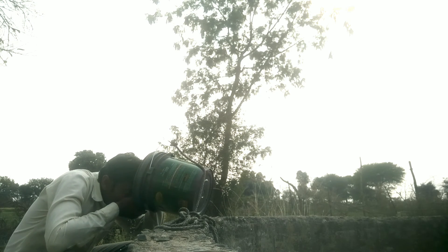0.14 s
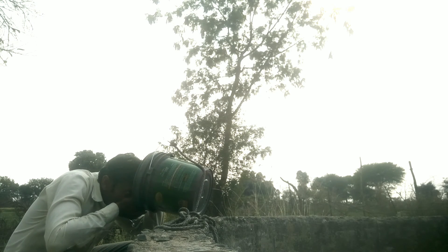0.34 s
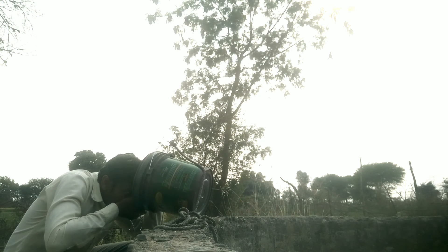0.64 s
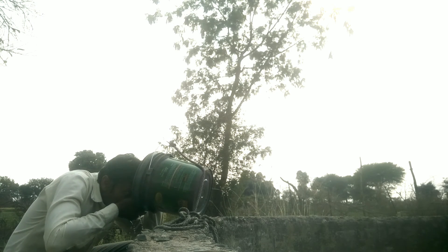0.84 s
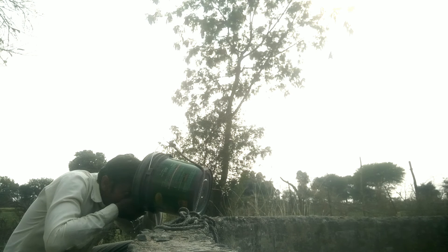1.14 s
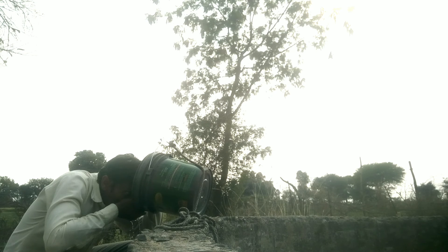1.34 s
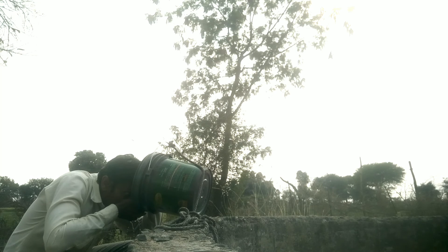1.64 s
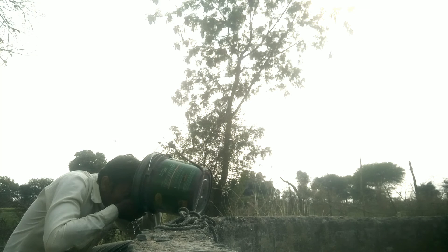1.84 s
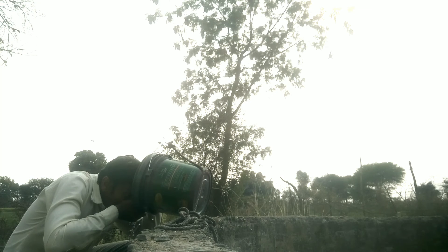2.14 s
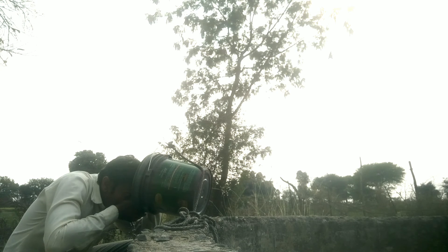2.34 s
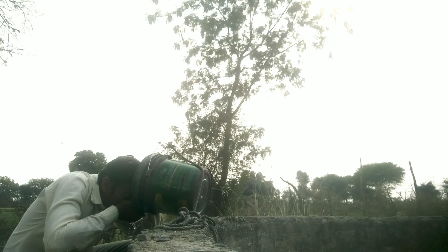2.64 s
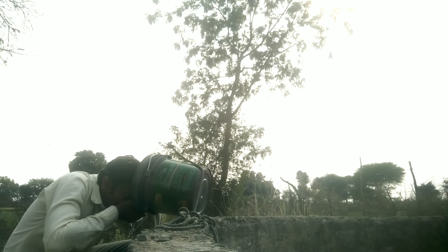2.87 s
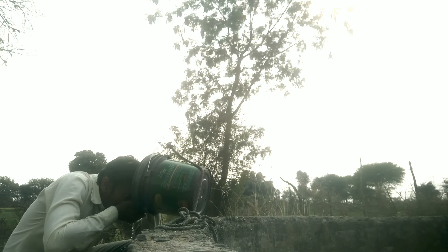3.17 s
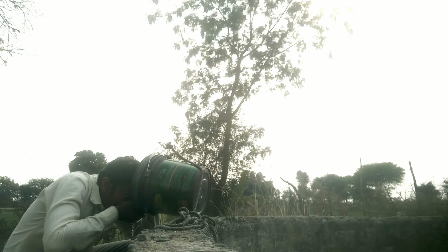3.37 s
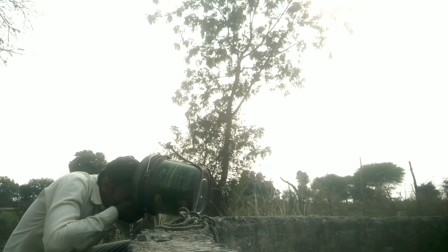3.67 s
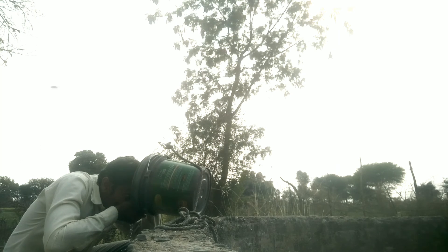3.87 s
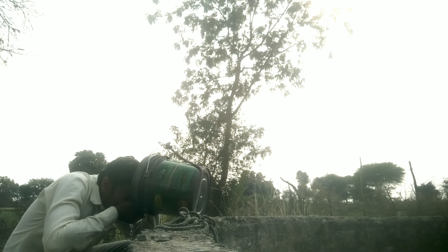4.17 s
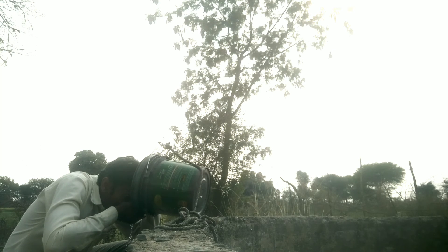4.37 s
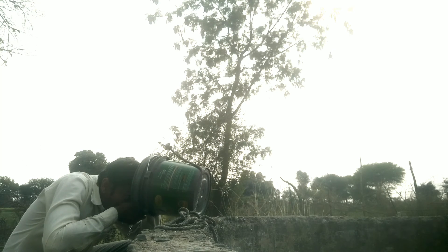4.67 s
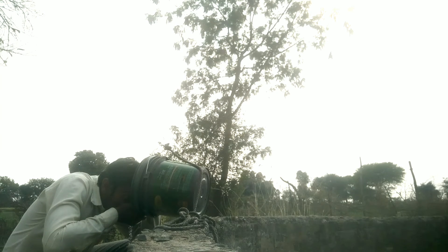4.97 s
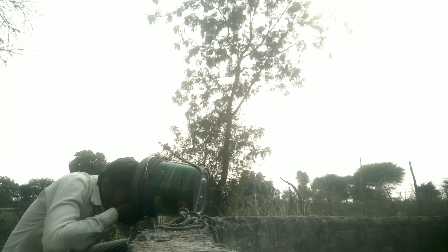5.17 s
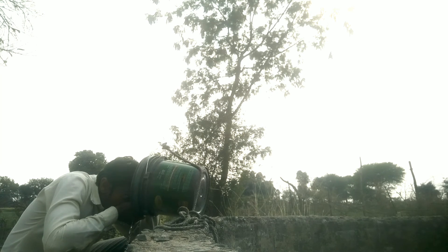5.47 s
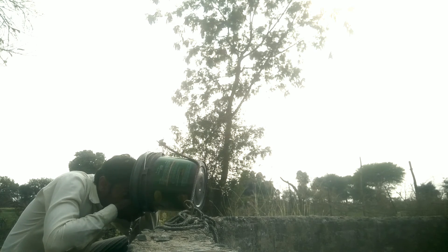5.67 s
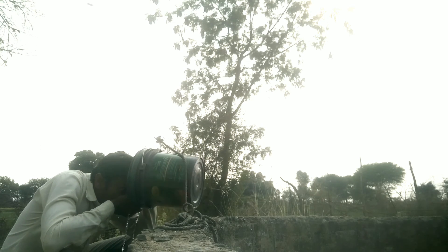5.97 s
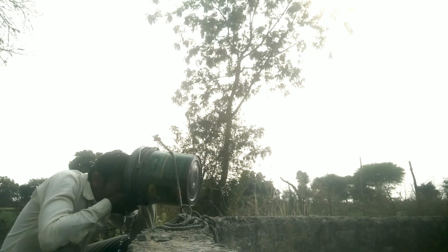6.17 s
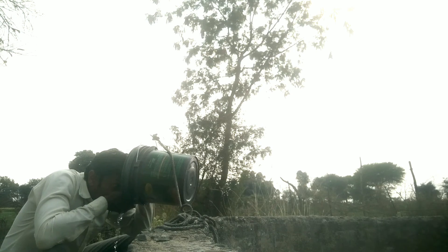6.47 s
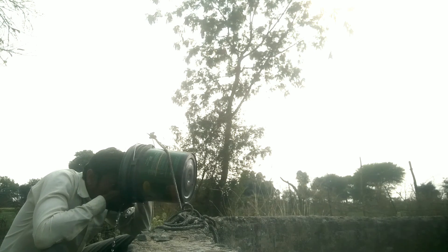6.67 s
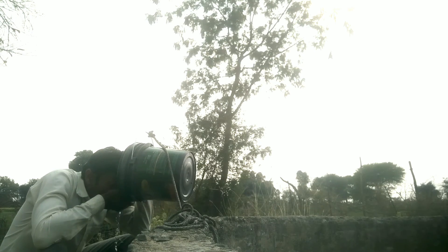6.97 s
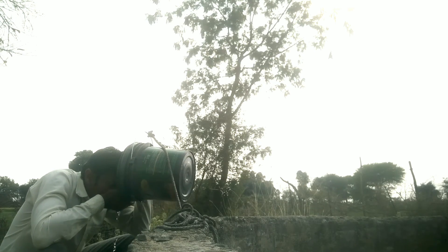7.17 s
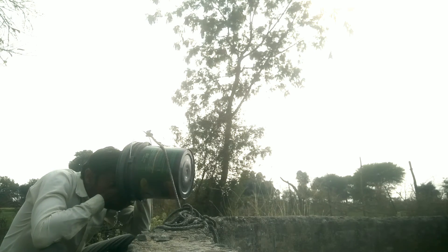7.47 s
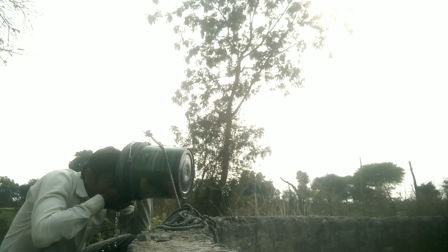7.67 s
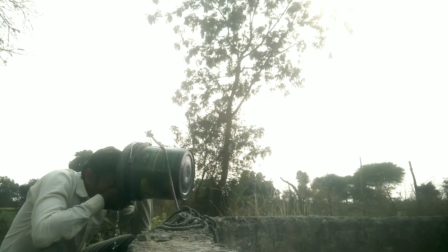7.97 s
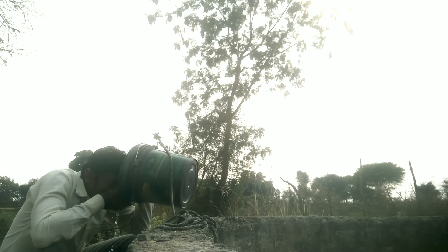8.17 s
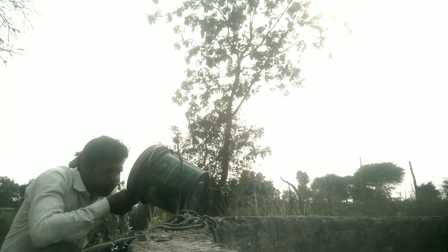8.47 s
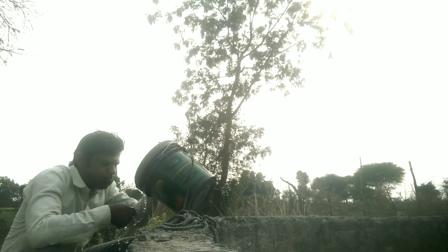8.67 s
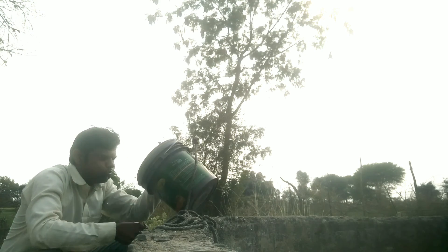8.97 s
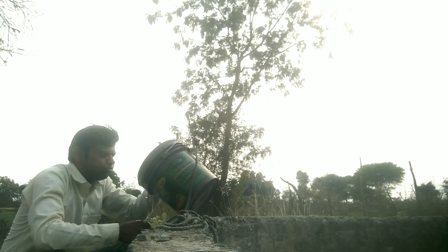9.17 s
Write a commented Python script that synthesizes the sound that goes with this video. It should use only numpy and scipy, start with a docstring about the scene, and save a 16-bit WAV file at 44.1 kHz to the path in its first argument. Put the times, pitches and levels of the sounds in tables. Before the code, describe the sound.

Soft outdoor hiss and a distant pump's low drone run throughout, the drone strongest in the first two and a half seconds. Far birds wail and chatter, thinning after five seconds, while closer ones trill and squawk. At about 1.1 seconds someone gives a short slurp from a plastic bucket, followed by occasional soft glugs and drips. A near bird sings two whistles and a dipping slur at about 2.2, 4.4, 6.2 and 7.9 seconds, louder the last two times, with a light echo from the trees. At 4.7 seconds the bucket knocks hollowly against a stone rim. Air pockets glug around 5.4 seconds, and water dribbles and splashes on stone, thickening from 6 to 7.4 seconds. Another glug comes at 8.2 seconds, then a quick cluster of dull bucket knocks at 8.5. The sharpest splashes land around 8.8 seconds and trickle away under a few bird notes.

```python
"""A field well among trees, with soft outdoor hiss and a distant pump motor droning on the breeze.
Birds trill, pipe and squawk, and far ones wail back. Someone drinks from a tilted plastic bucket:
air pockets glug, water dribbles and splashes on the stone rim, and the bucket rings as it knocks
against it. A near bird repeats a phrase of two long whistles and a dipping slur, a harmonic voice
shaped by its throat and echoed by the trees."""
import sys
import numpy as np
from scipy import signal
from scipy.fft import rfft
from scipy.io import wavfile
from scipy.ndimage import uniform_filter1d

SR = 44100
rng = np.random.default_rng(int(sys.argv[2]) if len(sys.argv) > 2 else 0)


def to_wav(s):
    """Save 16-bit WAV."""
    ch = np.atleast_2d(s).T  # columns
    pcm = np.round(np.clip(ch, -1, 1) * 32767)  # PCM
    wavfile.write(sys.argv[1], SR, pcm.astype(np.int16))


N = 410557
T = np.arange(N) / SR

# colour of a drop's impact on wet stone: f/Hz, level/dB
WET_STONE = [(1200, -9.5), (2500, -6.5), (3600, 0.5), (4550, -9), (5700, -5.5), (7200, -1), (9000, -3),
             (10000, -2.5), (11500, -4), (13500, -4.5), (15500, -10)]


def undb(db):
    """Decibels to gain."""
    return 10 ** (np.asarray(db) / 20)


def unit(x):
    """Scale to rms 1."""
    return x / np.sqrt(np.mean(x ** 2) + 1e-20)


def curve(points):
    """An automation line through (time, value) points."""
    return np.interp(T, *np.transpose(points))


def response(points, hz):
    """Gain at hz of an EQ curve of (f/Hz, level/dB) points."""
    f, db = np.transpose(points)
    return undb(np.interp(np.log(hz + 1e-9), np.log(f), db))


def colour(x, points):
    """Shape a sound with an EQ curve; rms 1."""
    gain = response(points, np.fft.rfftfreq(len(x), 1 / SR))
    return unit(np.fft.irfft(rfft(x) * gain, len(x)))


def walk(rate_hz, size=N):
    """Smooth random drift with a spread near 1."""
    k = max(int(SR / rate_hz), 2)
    steps = np.repeat(rng.standard_normal(size // k + 3), k)
    return np.sqrt(2) * uniform_filter1d(uniform_filter1d(steps, k), k)[k:k + size]


def cycles(hz):
    """Running phase of a moving frequency, in radians."""
    return 2 * np.pi * np.cumsum(hz) / SR


def fade(t, t60):
    """Exponential decay, 60 dB down at t60."""
    return np.exp(-np.log(1000) * t / t60)


def add(out, s, x):
    """Mix a sound in at time s."""
    i = min(max(int(s * SR), 0), N)
    out[i:i + len(x)] += x[:N - i]


def reverb(x, t60):
    """Scattered echoes: a decaying noise tail of unit energy."""
    t = np.arange(SR) / SR
    echoes = rng.standard_normal(SR) * fade(t, t60) * np.minimum(t / .02, 1)
    return signal.fftconvolve(x, echoes / np.linalg.norm(echoes))[:N]


def breeze():
    """Level ride in dB as the breeze carries the pump's drone: a slow drift with brief swells."""
    # drift of the drone: t/s, level/dB
    drift = [(0, -57.5), (.1, -51), (.14, -46), (1.5, -46.5), (2.1, -51), (2.65, -49.5), (2.85, -59.5),
             (4.2, -68), (4.68, -60.5), (4.88, -52.5), (5.8, -54.5), (8.8, -54.5), (9.3, -56.5)]
    # brief swells: t/s, boost/dB
    swells = [(3.02, 6), (3.43, 7.5), (3.87, 13)]
    return curve(drift) + sum(db * np.exp(-((T - s) / 0.089) ** 2) for s, db in swells)


def air():
    """A bed of soft outdoor hiss that swells with the breeze."""
    # colour of the outdoor air: f/Hz, level/dB
    spectrum = [(120, -48), (200, -5.5), (330, -5.5), (1500, -7.5), (2380, -8), (4500, -16.5),
                (7500, -21.5), (15500, -16.5)]
    breeze_db = uniform_filter1d(breeze(), size=SR // 4)
    hiss = colour(rng.standard_normal(N), spectrum)
    return hiss * undb(-67 + 0.29 * (breeze_db - breeze_db.mean()) + 0.74 * walk(20))


def pump(mains_hz=50):
    """Shaft tone, octave and rumble, with a whine one shaft rate above the magnetic hum frequency."""
    # shaft speed: t/s, f/Hz
    shaft_speed = [(0, 45.93), (.6, 47.64), (2.7, 49.64), (4.5, 50.03), (6.3, 45.6), (9.3, 40.58)]
    db = breeze()
    turn = cycles(curve(shaft_speed) * (1 + 0.0042 * walk(13)))
    hum = cycles(np.full(N, 2. * mains_hz))
    shaft = undb(3 + walk(16)) * np.cos(turn)
    # as the drone swells, the octave grows fastest and the whine a little less than the rest
    octave = undb(0.45 * (db + 56) + 1.3 * walk(10)) * np.cos(2 * turn)
    whine = undb(-4.5 - 0.031 * (db + 30.5) + 2.5 * walk(20)) * np.cos(turn + hum)
    rumble_eq = [(15, -16), (30, -43), (45, -1), (90, 5), (150, -6.5), (210, -19), (600, -32),
                 (2000, -72)]
    rumble = colour(rng.standard_normal(N), rumble_eq)
    return undb(db) * (shaft + octave + whine + undb(-4) * rumble)


def calls(table, quaver_hz, quaver, throb, rough, rough_hz=600, overtone_db=-27, arch=0.0198):
    """Two-partial bird calls gliding along a slight arch; each quaver is loudest as it falls."""
    out = np.zeros(N)
    for s, length, first_hz, last_hz, db in table:
        progress = np.linspace(0, 1, int(length * SR))
        bow = np.abs(np.sin(np.pi * progress))
        beat = cycles(quaver_hz * (1 + 0.061 * walk(33, len(progress))))
        hz = first_hz + (last_hz - first_hz) * progress
        hoarseness = rough * walk(rough_hz, len(progress))
        phase = cycles(hz * (1 + arch * bow + quaver * np.cos(beat) + hoarseness))
        tone = np.sin(phase) + undb(overtone_db) * np.sin(2 * phase)
        swell = np.sqrt(bow) * (1 + throb * np.sin(beat))
        add(out, s, undb(db) * unit(swell * tone))
    return out


def wails(centre_hz=1358, spread=0.0126, max_glide=0.0253):
    """Far birds wail on nearly one pitch, each gliding a little up or down."""
    # wails: t/s, length/s, relative level/dB
    cues = [(0.255, 0.035, -64.5), (1.24, 0.19, -62.5), (1.439, 0.064, -59.5), (1.607, 0.104, -56.5),
            (1.806, 0.11, -54.5), (2.302, 0.11, -57.5), (2.6, 0.14, -56.5), (2.842, 0.15, -54),
            (2.972, 0.097, -51.5), (3.198, 0.66, -60), (3.743, 0.54, -74.5), (4.32, 0.35, -66.5),
            (4.717, 0.093, -58.5), (5.176, 0.19, -67), (5.699, 0.096, -67)]
    detune, bend = rng.uniform(-0.973, 1, (len(cues), 2)).T
    pitches, glides = centre_hz * (1 + spread * detune), max_glide * bend
    notes = [(s, length, hz * (1 - glide), hz * (1 + glide), db)
             for (s, length, db), hz, glide in zip(cues, pitches, glides)]
    return calls(notes, quaver_hz=21.06, quaver=0.029, throb=0.51, rough=0.0391)


def cries(rise=1.07):
    """Far, hoarse cries at scattered pitches, each rising a little."""
    # cries: t/s, length/s, start f/Hz, relative level/dB
    cues = [(0.724, 0.24, 905, -64.5), (0.918, 0.084, 1697, -64), (1.079, 0.27, 1038, -62.5),
            (1.132, 0.3, 2873, -74), (1.147, 0.35, 2426, -69), (1.76, 0.22, 1473, -64),
            (2.769, 0.15, 878, -66.5), (3.039, 0.33, 1542, -56), (3.088, 0.13, 1198, -57.5),
            (3.132, 0.103, 1930, -65), (3.295, 0.11, 886, -65.5), (3.42, 0.131, 1620, -56.5),
            (4.37, 0.28, 1562, -69)]
    notes = [(s, length, hz, hz * rise, db) for s, length, hz, db in cues]
    return calls(notes, quaver_hz=17, quaver=0.028, throb=0.75, rough=0.045)


def chatter(count=110):
    """Many far birds add brief notes that thin out as the chorus dies down."""
    when, length, pitch, glide, size = rng.random((count, 5)).T
    start = 1 + when ** 1.5 * (N / SR - 2)
    first_hz = 1100 * 2.4 ** pitch
    last_hz = first_hz * (1 + 0.155 * (glide - .5))
    db = -68 + 10 * (size - .5) - 15 * when
    notes = np.transpose([start, 0.03 + 0.1006 * length, first_hz, last_hz, db])
    return calls(notes, quaver_hz=30.7, quaver=0.0035, throb=0.66, rough=0.02)


def far_birds():
    """The distant chorus, washed in a long echo from trunks and leaves."""
    chorus = wails() + cries() + chatter()
    return undb(1.06) * (chorus + undb(-3) * reverb(chorus, t60=0.9))


def midground_birds():
    """Fairly close birds trill, pipe and squawk, with a short echo from the trees."""
    # warbling trills, clear notes, hoarse squawks: t/s, length/s, start f/Hz, end f/Hz, relative level/dB
    trills = [(.116, 0.11, 2273, 2350, -58), (.208, 0.066, 2420, 2604, -57),
              (.338, 0.11, 2794, 2400, -59.5), (3.8, .15, 2274, 2600, -62.5),
              (9.09, 0.071, 2290, 2450, -63)]
    pipes = [(.278, 0.052, 2005, 1590, -61), (3.95, 0.086, 2510, 2554, -67.5),
             (4.205, 0.072, 1930, 1760, -68), (7.29, 0.097, 2790, 2400, -68), (8.68, .03, 1650, 1690, -67),
             (8.87, 0.073, 1687, 1580, -67.5), (9.235, .17, 2600, 2550, -62)]
    squawks = [(1.01, 0.17, 1988, 1768, -57), (2.125, 0.027, 2420, 2520, -61),
               (2.162, 0.034, 1735, 1930, -56), (3.88, 0.067, 2790, 2820, -65),
               (4.1, 0.042, 2300, 2380, -64.5), (4.102, 0.03, 1770, 1700, -66),
               (4.91, 0.073, 2106, 1925, -61)]
    voices = (calls(trills, quaver_hz=32.76, quaver=0.026, throb=0.71, rough=0.013)
              + calls(pipes, quaver_hz=32.8, quaver=0, throb=0.28, rough=0.011)
              + calls(squawks, quaver_hz=71.4, quaver=0, throb=0.54, rough=0.043, rough_hz=447))
    return undb(1.5) * voices + undb(-4) * reverb(voices, t60=0.27)


def flow():
    """Envelope of the spilling water: each spill builds, holds and trickles out."""
    # spills from the bucket onto the stone: t/s, length/s, attack/s, level/dB
    spills = [(1.754, 2.33, 0.084, -77.5), (4.666, 0.47, 0.017, -69.5), (5.246, 0.82, 0.11, -67.5),
              (6.172, 1.24, 0.067, -63), (7.964, 0.6, 0.04, -60.5), (8.712, 0.14, 0.013, -55)]
    gain = np.zeros(N)
    for s, length, attack_s, db in spills:
        t = np.maximum(T - s, 0)
        running = undb(db) * np.minimum(t / attack_s, 1)
        gain = np.maximum(gain, running * fade(np.maximum(t - length, 0), t60=1))
    return gain


def splat(hz, focus_db, length_s):
    """One drop bursts on the stone: a tick of noise, strongest around hz, with a faint tail."""
    t = np.arange(SR // 40) / SR
    attack = 1 - np.exp(-t / 0.0011)
    decay = np.exp(-(t / length_s) ** 2) + 0.24 * fade(t, 0.08)
    burst = rng.standard_normal(len(t)) * attack * decay
    return colour(burst, [(hz / 1.52, 0), (hz, focus_db), (hz * 1.08, 0)])


def dribble(count=600, spread_db=4.5):
    """Droplets patter on the stone; the heavier the flow, the more they merge into spray."""
    patter = np.zeros(N)
    for k, (when, size, pitch) in enumerate(rng.random((count, 3))):
        drop = splat(3100 * 4.5 ** np.sqrt(pitch), focus_db=9, length_s=.0034)
        s = (k + 2 * when) / count * N / SR
        add(patter, s, undb(-spread_db * np.log(size + 0.21)) * drop)
    water = flow()
    merged = np.clip(0.16 + water / undb(-33), 0, .35)
    spray = np.sqrt(merged) * rng.standard_normal(N)
    return colour(np.sqrt(1 - merged) * unit(patter) + spray, WET_STONE) * water


def bubble(hz, t60, rise=0.28, attack_share=0.021):
    """A ringing air pocket whose pitch rises as it fades; long rings start more softly."""
    t = np.arange(int(t60 * SR) + 2) / SR
    attack = 1 - np.exp(-t / (attack_share * t60))
    return np.sin(cycles(hz * (1 + rise * t / t60))) * fade(t, t60) * attack


def big_drops():
    """Big drops splash, each with its own colour, and trapped bubbles plink."""
    # splashes on the wet stone: t/s, peak level/dB
    drops = [(1.52, -51.5), (2.985, -55), (3.999, -50.5), (4.963, -50), (5.139, -47.5), (5.383, -49),
             (5.405, -48), (5.53, -44.5), (5.709, -46), (5.922, -46), (5.969, -51), (6.064, -51),
             (6.2067, -43), (6.275, -45), (6.3032, -39.5), (6.3274, -44), (6.4132, -39), (6.4465, -36.5),
             (6.465, -49), (6.523, -47), (6.566, -38.5), (6.627, -41), (6.8163, -48), (6.932, -36.5),
             (7.044, -46), (7.062, -43.5), (7.1052, -47), (7.192, -45), (7.211, -40.5), (7.275, -48.5),
             (8.2174, -41.5), (8.725, -45.5), (8.7473, -30.5), (8.773, -43), (8.785, -35), (8.7954, -33),
             (8.8355, -40), (8.8635, -41), (8.89, -38)]
    # trapped bubbles: t/s, level/dB, start f/Hz
    plinks = [(2.985, -61, 2500), (5.529, -43.5, 3420), (6.065, -50, 3540), (6.413, -41.5, 1450),
              (6.4474, -45, 3450), (6.642, -43, 2020), (7.063, -46, 3100), (8.2172, -45, 3002),
              (8.736, -43.5, 3080), (8.747, -40.5, 2390), (8.773, -39.5, 3060), (8.863, -45, 3170),
              (8.935, -49, 3470), (9.0, -51, 3530)]
    out = np.zeros(N)
    for s, db in drops:
        splash = colour(splat(rng.uniform(5400, 11800), focus_db=8, length_s=0.0028), WET_STONE)
        add(out, s, undb(db) * splash / np.abs(splash).max())
    for s, db, hz in plinks:
        add(out, s, undb(db) * bubble(hz, t60=0.029, rise=0.12))
    return out


def slurp():
    """A short, ragged gurgle of water and air at the rim."""
    db = curve([(1.0, -67), (1.12, -57), (1.155, -50.5), (1.22, -52.5), (1.55, -115)])
    gurgle_eq = [(550, -19), (1000, -4), (1800, -4.5), (3000, -22), (8000, -70)]
    return colour(rng.standard_normal(N), gurgle_eq) * undb(db + 2.9 * walk(120))


def glugs():
    """Air pockets ring in the moving water, blurred by the hollow of the bucket."""
    # glugs and plops: t/s, relative level/dB, start f/Hz, t60/s
    pockets = [(1.134, -43, 676, 0.021), (1.161, -45.5, 550, 0.038), (2.085, -52, 1034, 0.059),
               (3.514, -55, 470, 0.055), (5.284, -49.5, 728, 0.059), (5.385, -47.5, 1006, 0.062),
               (5.459, -39, 1533, 0.033), (5.46, -44.5, 827, 0.035), (5.513, -49.5, 1410, 0.039),
               (7.48, -59, 645, 0.1), (8.175, -50.5, 442, 0.19), (8.197, -43, 520, 0.037),
               (9.067, -48, 906, 0.086)]
    out = np.zeros(N)
    for s, db, hz, t60 in pockets:
        add(out, s, undb(db) * bubble(hz, t60))
    return undb(4) * out + undb(0.5) * reverb(out, t60=0.21)


def bucket_knocks(slosh=0.018, low_cut_hz=106):
    """Each knock is a short push that rings the bucket; longer contact sounds duller."""
    # knocks on the stone rim: t/s, peak level/dB, contact/s
    knocks = [(4.7021, -28.5, 0.00081), (4.709, -32.5, 0.0032), (4.7327, -32.5, 0.00082),
              (8.482, -33.5, 0.0029), (8.511, -29.5, 0.0067), (8.598, -33, 0.0028), (8.607, -31, 0.0083)]
    # modes of the water-laden bucket: f/Hz, level/dB, t60/s
    modes = [(135, 11, 0.14), (161.6, 1.5, 0.43), (190, 3.5, 0.27), (253.4, 0.5, 0.28), (292.4, 4, 0.1),
             (389, -9.5, 0.21), (620, -4.5, 0.054), (1644, 4.5, 0.075)]
    out, t = np.zeros(N), np.arange(SR // 2) / SR
    # the bucket is too small to radiate deep bass
    radiation = signal.butter(2, low_cut_hz, "high", fs=SR, output="sos")
    for s, db, contact in knocks:
        shifts = 1 + slosh * rng.uniform(-1.3, 1, len(modes))  # moving water retunes each mode
        ring = sum(undb(mode_db) * np.sin(2 * np.pi * hz * shift * t) * fade(t, t60)
                   for (hz, mode_db, t60), shift in zip(modes, shifts))
        push = t * np.exp(-2 * np.pi * t / contact)
        blow = signal.sosfilt(radiation, signal.fftconvolve(ring, push)[:len(t)])
        add(out, s, undb(db) * blow / np.abs(blow).max())
    return out


def voice(hz, db, rasp_s, upper_db, flutter_hz=82, edge_s=0.0051):
    """A harmonic whistle whose second partial sits in the throat resonance; it opens with a flutter."""
    # resonance of the near bird's throat and beak: f/Hz, level/dB
    throat = [(1000, -41), (1300, -9.5), (1430, -20), (2000, 0.5), (2850, -2.5), (3900, -14.5), (5400, -21),
              (6800, -20.5), (8100, -26.5), (10000, -37)]
    t = np.arange(len(hz)) / SR
    rasp = np.exp(-(t / rasp_s) ** 4)
    # low, relaxed notes lose their upper partials and turn hoarse
    tension = np.clip(hz / 1270, 0, 1) ** 7
    hoarse = 0.0025 + 0.005 * (1 - tension) + 0.0252 * rasp
    phase = cycles(hz * (1 + hoarse * walk(500, len(t)) + 0.0019 * walk(26.7, len(t))))
    fundamental = np.minimum(t / (0.36 * t[-1]), 1) ** 2  # comes in late
    gains = [fundamental, 1] + 5 * [tension * undb(upper_db)]
    tone = sum(gain * response(throat, k * hz) * np.sin(k * phase) for k, gain in enumerate(gains, 1))
    flutter = 1 + 0.73 * rasp * np.sin(cycles(flutter_hz * (1 + 0.15 * walk(52, len(t)))))
    gate = np.clip(np.minimum(t, t[-1] - t) / edge_s, 0, 1)
    return np.sqrt(2) * tone * flutter * gate * undb(db + 0.98 * walk(98.5, len(t)))


def chips(length_s=0.045):
    """Bright notes that fall away almost at once."""
    # chips that open a phrase: t/s, start f/Hz, relative level/dB
    cues = [(4.377, 1244, -59), (7.77, 1296, -47)]
    out, fall = np.zeros(N), np.linspace(0, 1, int(length_s * SR)) ** 3
    for s, hz, db in cues:
        add(out, s, voice(hz * (1 - 0.24 * fall), db - 19 * fall, rasp_s=0.0028, upper_db=4))
    return out


def whistles(swell_db=19.5, sag_s=0.0893, release_s=0.0065):
    """Pitch and level scoop up with effort, the pitch sags after the top; both drop at the release."""
    # long whistles: t/s, length/s, rise/s, start f/Hz, top f/Hz, relative level/dB,
    # raspy onset/s, upper partials/dB
    cues = [(2.192, 0.27, 0.081, 1180, 1336, -48, 0.0051, -11.5),
            (2.551, 0.19, 0.06, 1280, 1297, -50.5, 0.052, -8.5),
            (4.433, 0.21, 0.09, 1223, 1344, -55, 0.0045, -4.5),
            (4.739, 0.155, 0.0676, 1317, 1371, -45, 0.056, -6.5),
            (6.178, .252, 0.165, 1258, 1377, -40, 0.0015, -4.5),
            (6.518, 0.16, 0.19, 1237, 1450, -35.5, 0.064, -5),
            (7.933, 0.232, 0.2, 1257, 1341, -38, 0.043, -5)]
    out = np.zeros(N)
    for s, length, rise_s, start_hz, top_hz, db, rasp_s, upper_db in cues:
        t = np.arange(int(length * SR)) / SR
        slack, held = np.maximum(1 - t / rise_s, 0), np.maximum(t - rise_s, 0)
        sag = 1 - np.exp(-(held / sag_s) ** 2)
        release = np.exp((t - length) / release_s)
        scoop_hz = (top_hz - start_hz) * slack ** 1.8
        hz = top_hz * (1 - 0.028 * sag - 0.14 * release) - scoop_hz
        level_db = db - swell_db * slack ** 3 - 12 * release
        bright_db = upper_db + 10 * slack ** 3  # the upper partials speak before the swell
        add(out, s, voice(hz, level_db, rasp_s, bright_db))
    return out


def flick(first_hz, top_hz, length_s=0.06, rise_s=0.05, overtone_db=-3):
    """A quick upward sweep that levels off; the fundamental takes over as it climbs."""
    t = np.arange(int(length_s * SR)) / SR
    climb = np.sin(np.pi / 2 * t / rise_s) ** 2
    hz = first_hz + (top_hz - first_hz) * climb
    phase = cycles(hz * (1 + 0.011 * walk(450, len(t))))
    gate = np.clip(np.minimum(t / 0.0027, (t[-1] - t) / 0.012), 0, 1)
    return unit(gate * ((0.067 + climb) * np.sin(phase) + undb(overtone_db) * np.sin(2 * phase)))


def slurs(held_hz=1300, fall_s=0.14, turn_s=0.024, attack_s=0.021):
    """The voice relaxes into a dip, lifts just before the end, then breaks upward in a flick."""
    # slurs that close a phrase: t/s, length/s, lowest f/Hz, relative level/dB,
    # flick top f/Hz, flick level/dB
    cues = [(2.853, 0.1, 989, -58, 1445, -56.5), (4.988, 0.13, 1054, -51, 1513, -57),
            (6.757, .153, 1024, -47, 1585, -49), (8.244, 0.25, 1050, -45.5, 1471, -48)]
    out = np.zeros(N)
    for s, length, low_hz, db, top_hz, flick_db in cues:
        t = np.arange(int(length * SR)) / SR
        height = np.sin(np.pi / 2 * np.clip((length - turn_s - t) / fall_s, -1, 1)) ** 2
        lift = 0.096 * np.exp((t - length) / 0.0052)
        hz = low_hz * (1 + lift) + (held_hz - low_hz) * height
        dip = voice(hz, db, rasp_s=0.282 * length, upper_db=-10 + 8 * height)
        add(out, s, dip * (1 - np.exp(-t / attack_s)))
        add(out, s + length, undb(flick_db) * flick(1.19 * low_hz, top_hz))
    return out


def near_bird(turns_s=5.7, away_db=4):
    """The lead song among the trees; until the bird turns, it faces away and sends more into the echo."""
    song = chips() + whistles() + slurs()
    send = song * undb(away_db * (T < turns_s))
    return song + undb(-9.5) * reverb(send, t60=0.42)


def scene():
    """Birds, background bed, bucket and water in one mono mix."""
    birds = near_bird() + midground_birds() + far_birds()
    bed = pump() + air()
    drinking = bucket_knocks() + slurp() + glugs() + dribble() + big_drops()
    return (birds + bed + drinking)[None]


def record(dry):
    """A steep low-pass takes off the treble above 15.8 kHz."""
    return signal.sosfilt(signal.ellip(10, .2, 70, 15800, fs=SR, output="sos"), dry)


dry = scene()
out = record(dry)
to_wav(out)
```